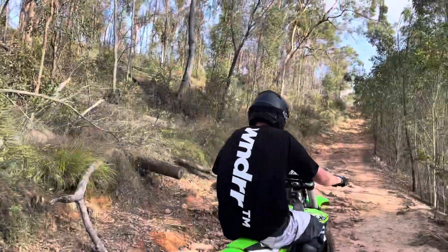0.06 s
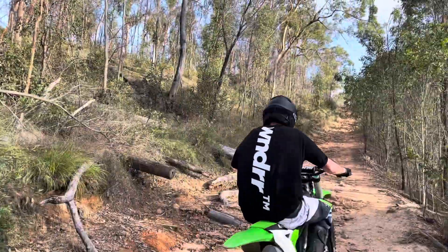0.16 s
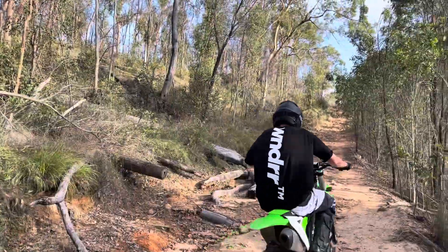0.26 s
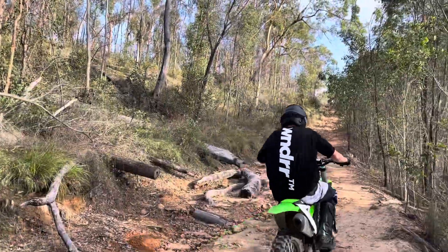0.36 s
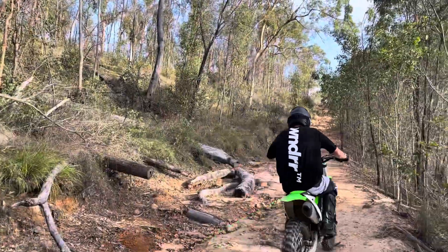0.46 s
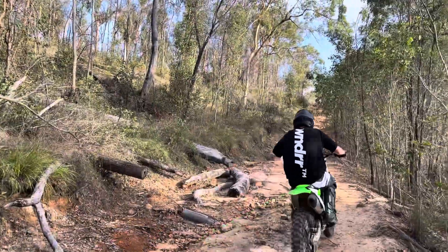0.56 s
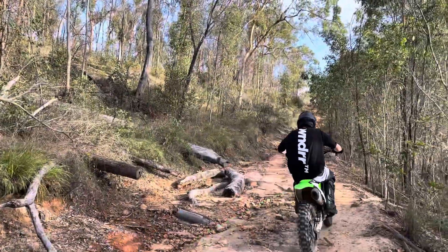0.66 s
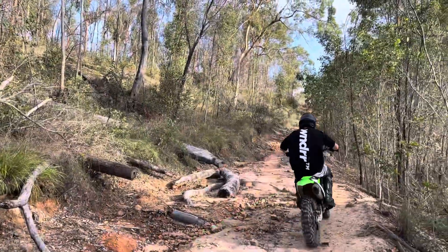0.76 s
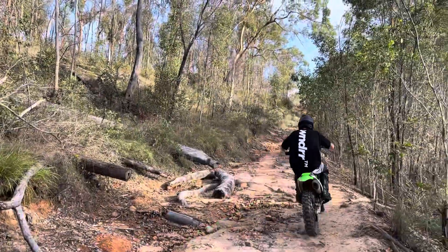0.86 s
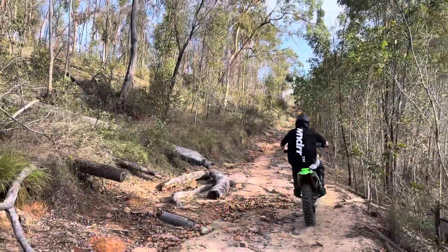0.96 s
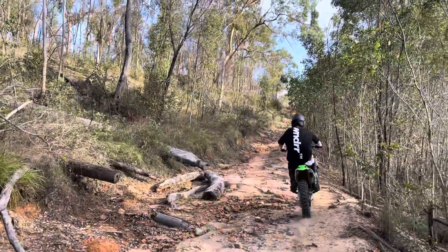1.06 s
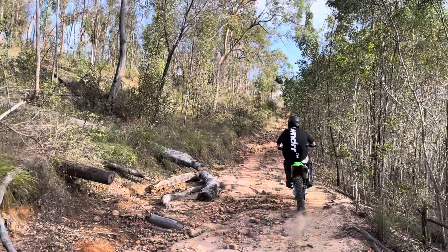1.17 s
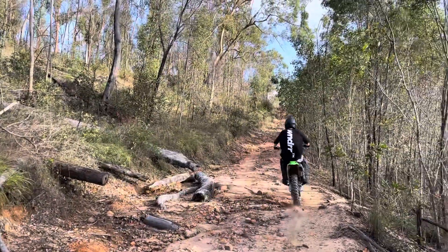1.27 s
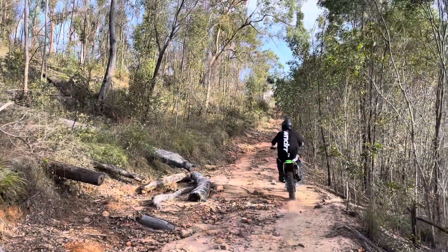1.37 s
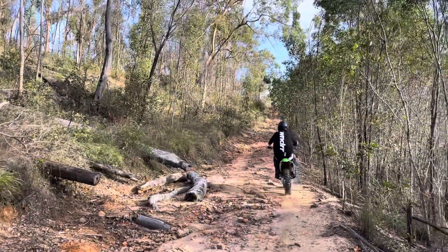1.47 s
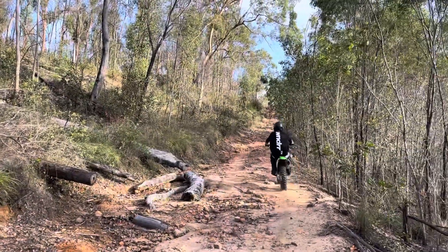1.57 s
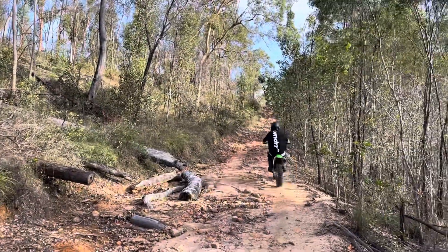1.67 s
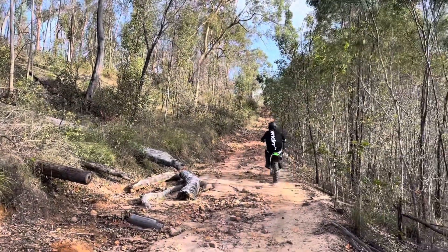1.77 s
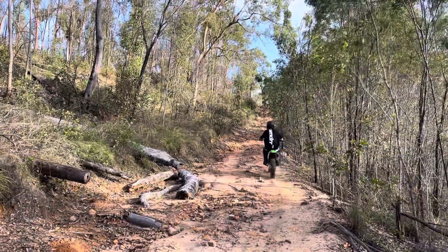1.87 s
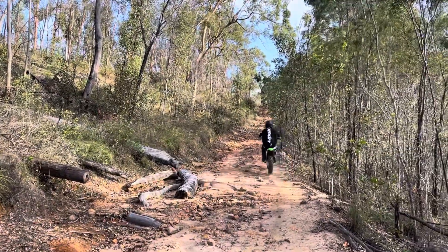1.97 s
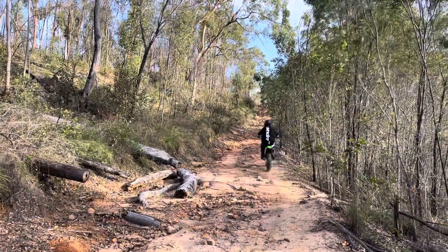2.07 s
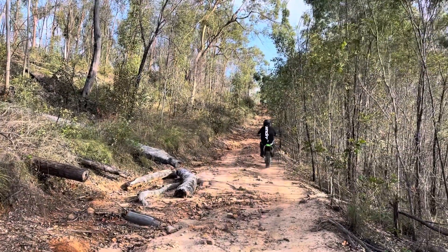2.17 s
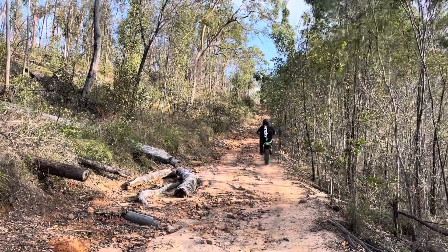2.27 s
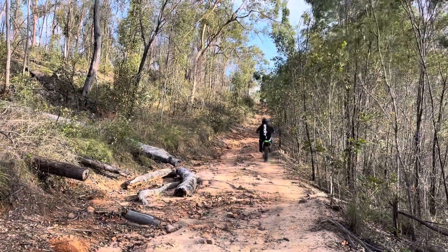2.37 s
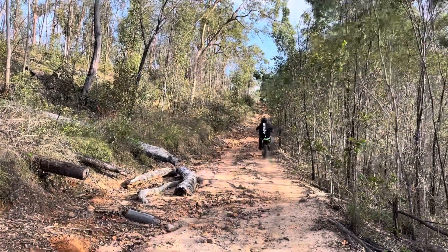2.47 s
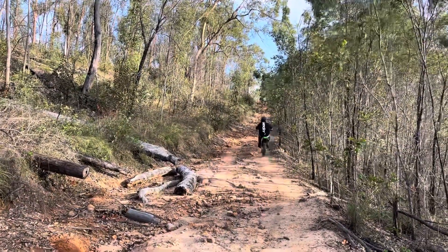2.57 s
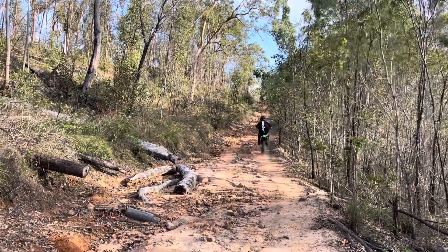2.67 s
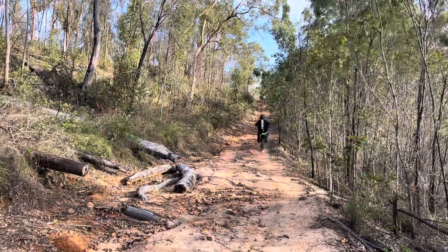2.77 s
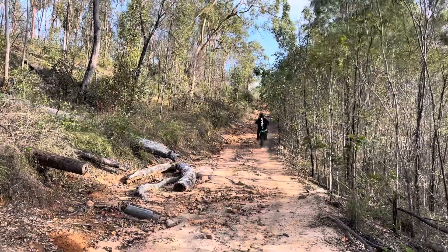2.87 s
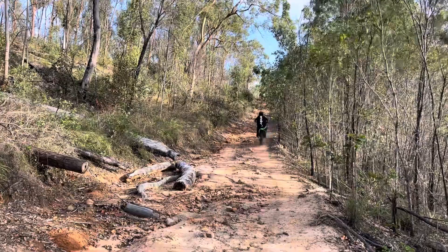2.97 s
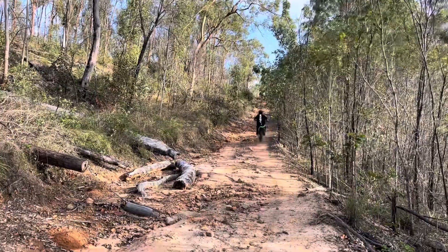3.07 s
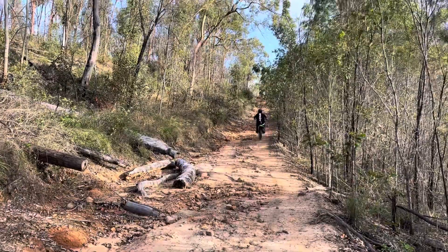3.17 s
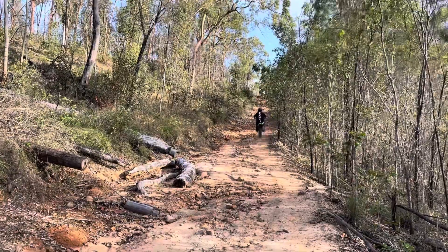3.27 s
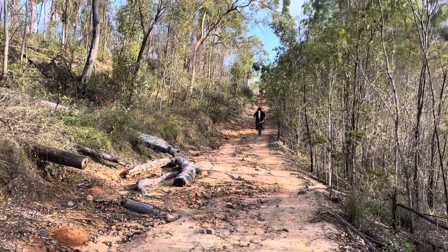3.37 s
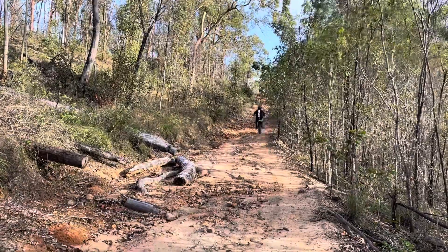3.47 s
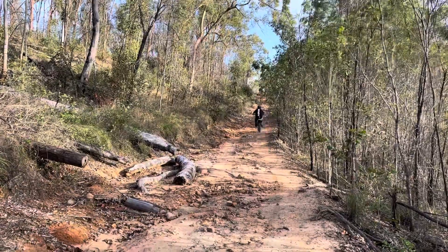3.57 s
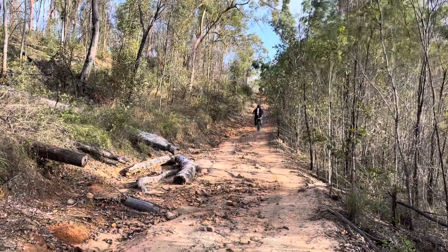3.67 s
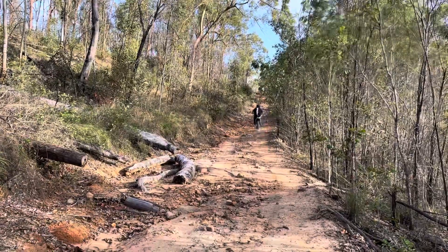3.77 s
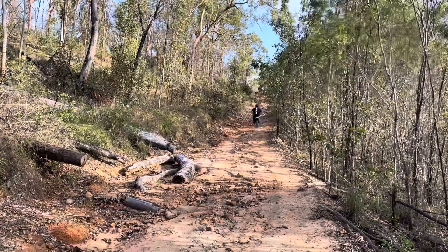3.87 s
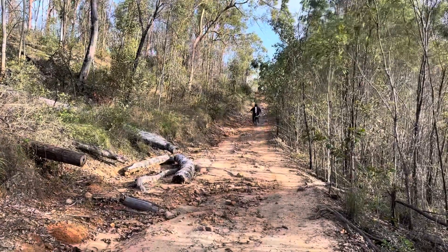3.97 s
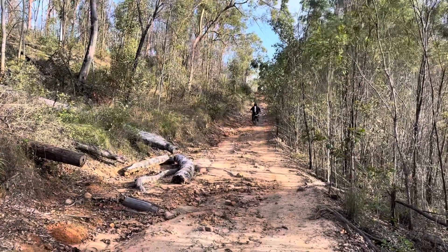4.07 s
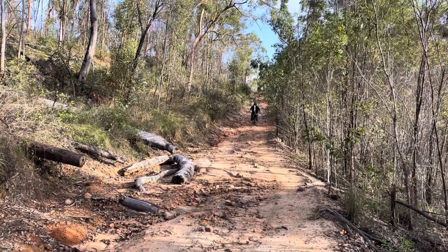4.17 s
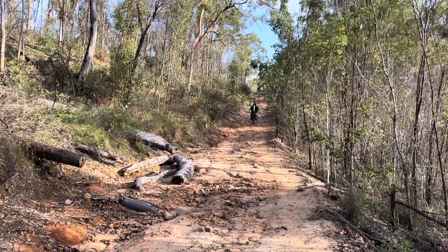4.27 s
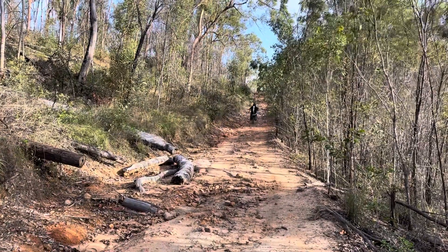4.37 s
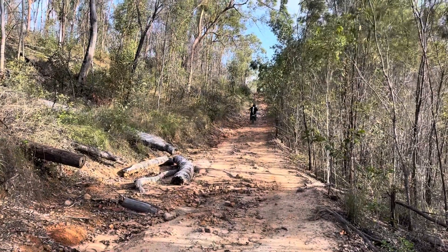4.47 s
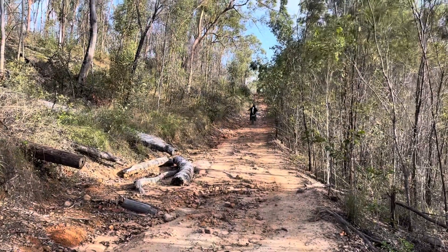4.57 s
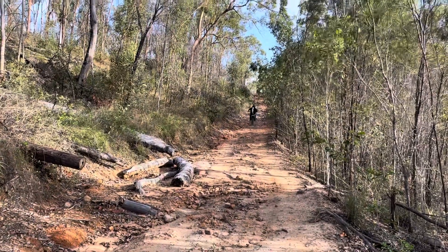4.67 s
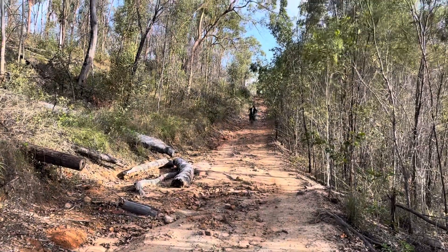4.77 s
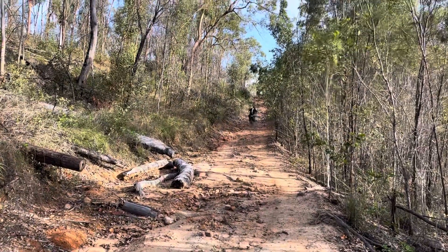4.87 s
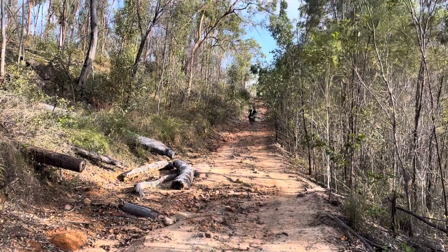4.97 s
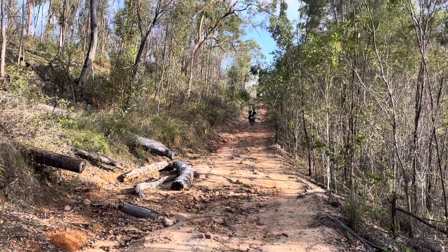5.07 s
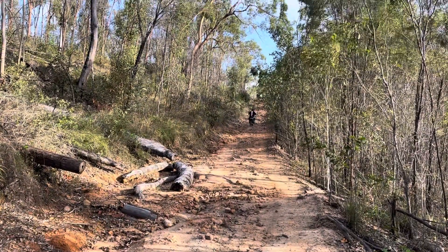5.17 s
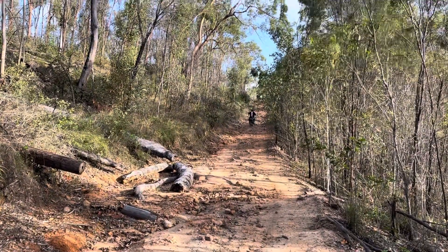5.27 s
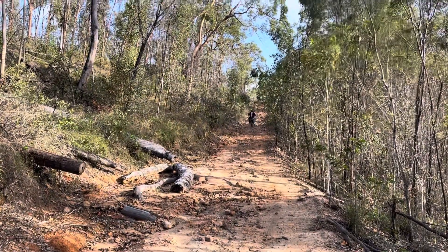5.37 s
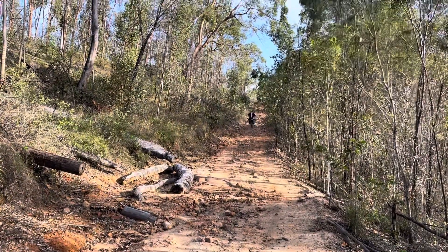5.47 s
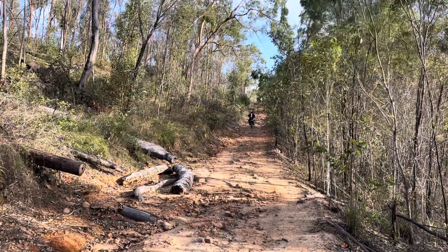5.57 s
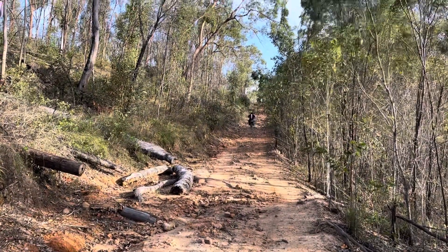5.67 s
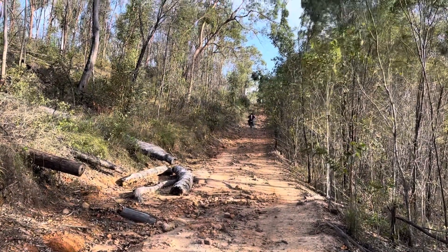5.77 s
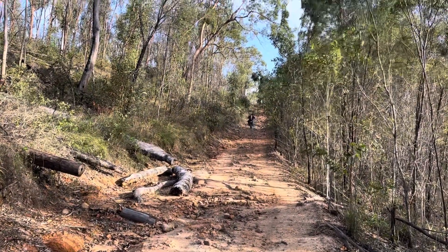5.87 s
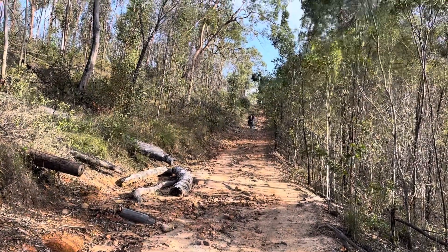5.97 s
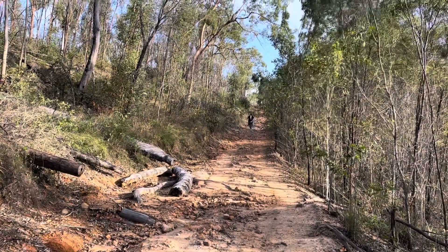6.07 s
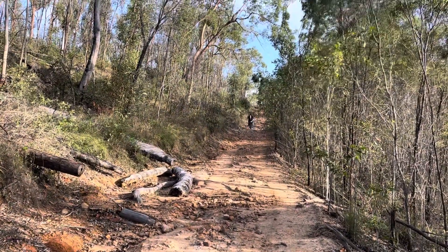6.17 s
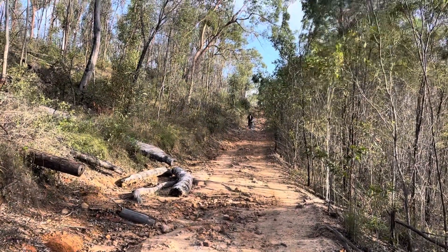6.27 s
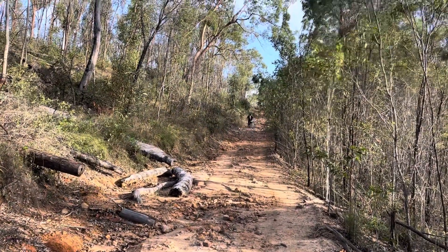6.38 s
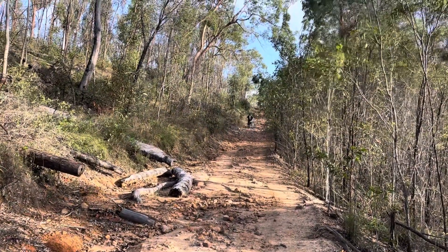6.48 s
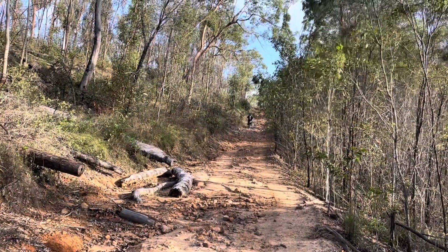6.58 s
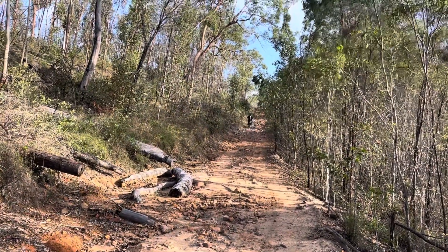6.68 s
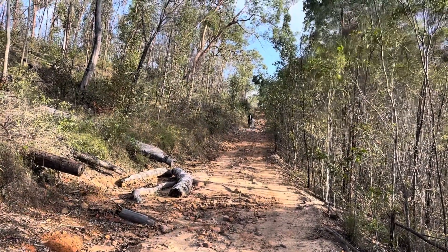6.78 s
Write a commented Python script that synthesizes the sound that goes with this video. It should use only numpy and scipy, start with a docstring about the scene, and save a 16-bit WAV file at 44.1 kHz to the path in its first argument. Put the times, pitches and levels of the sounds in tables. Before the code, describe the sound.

A single-cylinder four-stroke dirt bike is right beside the microphone at 0 s, its exhaust barking loud and hollow, about 26 heavy pulses a second, with sharp cracks at 0.25-0.4 s. At about 0.5 s the throttle shuts and two deep chugs sound. From 0.63 s it opens again, crackling, and revs climb to roughly 32 by 1 s, then waver up toward 37 through 3.1 s as the bike climbs away; faint gear whine fades by 2 s, and a harsher rasp shows around 2.5 s. A backfire bangs at 3.15 s, then a steadier, more distant pull lasts until 4.4 s. After a drop, a short hard rev flares highest near 4.8 s. More brief blips follow around 5.3, 5.7, 5.95 and 6.6 s, separated by soft low thuds, uneven pops and a 5.8 s backfire. Trees add short diffuse echoes; the distant rasp blurs into wash.

```python
"""A hard exhaust bark and cracks from close by: a single-cylinder four-stroke dirt bike pulls away
and climbs a rough forest track, the throttle opened and shut in bursts near the top.
Each firing rings the exhaust pipe modes and blows a puff of noise; with the throttle shut a soft, low
thud is left. Trees scatter the sound back; with distance the puffs blur into a steadier wash."""
import sys
import numpy as np
from scipy import signal
from scipy.fft import rfft, irfft, next_fast_len
from scipy.io import wavfile

SR = 44100
rng = np.random.default_rng(int(sys.argv[2]) if len(sys.argv) > 2 else 0)


def unload_audio(sound):
    """Save the sound as a 16-bit wav file, at the path given as the first command line argument."""
    columns = np.transpose(np.atleast_2d(sound))
    # keep every value between -1 and 1, then stretch to whole-number steps
    steps = np.round(np.clip(columns, -1, 1) * 32767)
    wavfile.write(sys.argv[1], SR, steps.astype(np.int16))


N = 301203
TIME = np.arange(N) / SR


def from_db(db):
    """Decibels to gain."""
    return 10 ** (np.asarray(db) / 20)


def rms_one(x):
    """Scale to unit power."""
    return x / np.sqrt(np.mean(x ** 2) + 1e-20)


def read(rows, when):
    """The columns of a curve at the given times."""
    s, *columns = np.transpose(rows)
    return [np.interp(when, s, c) for c in columns]


def at_hz(points, hz):
    """A spectrum read on a log-frequency axis."""
    f, value = np.transpose(points)
    return np.interp(np.log(hz), np.log(f), value)


def butter(x, hz, kind, order=2):
    """Butterworth filter."""
    sos = signal.butter(order, np.clip(hz, 10, .45 * SR), kind, fs=SR, output="sos")
    return signal.sosfilt(sos, x)


# Stereo width. Each row: frequency in Hz, side minus mid in dB.
WIDTH = [(100, -21), (400, -8), (2500, -15.5), (5000, -11), (9000, 2.5)]
# Stereo balance. Each row: frequency in Hz, left minus right in dB.
BALANCE = [(100, -8), (400, -9), (1400, -2.5), (2800, -0.5), (5000, 2.2), (9000, 0)]


def stereo_noise(spectrum):
    """Coloured noise, mid of unit power; width and balance vary with frequency."""
    size = next_fast_len(N, True)
    hz = np.maximum(np.fft.rfftfreq(size, 1 / SR), 1)
    mid, side = rfft(rng.standard_normal((2, size)))
    sign = np.array([[1], [-1]])
    low_hz, high_hz = spectrum[0][0], spectrum[-1][0]
    ends = 1 / (1 + (low_hz / hz) ** 4) / (1 + (hz / high_hz) ** 12)
    gain = ends * from_db(at_hz(spectrum, hz) + sign * at_hz(BALANCE, hz) / 2)
    both = irfft(gain * (mid + sign * side * from_db(at_hz(WIDTH, hz))))[:, :N]
    return both / np.std(both.mean(axis=0))


def lay_out(shapes, when):
    """Add one short shape per event along the time line."""
    out = np.zeros(N + 2 * SR)   # a spare second at each end
    for shape, start in zip(shapes, ((when + 1) * SR).astype(int)):
        out[start:start + len(shape)] += shape
    return out[SR:SR + N]


# Throttle twists; revs climb to a top, then sink until the next. Each row: lowest revs in seconds,
# opens in seconds, wide open in seconds, top revs in seconds, eases in seconds, shut in seconds,
# lowest firings per second, top firings per second, strength in dB, later coasting thud in dB.
PULLS = [(-.1, -.1, -.05, 0, .48, .555, 26.2, 26.18, 0, -27),
         (.582, .625, .8, 1.015, 3.11, 3.205, 23.64, 31.83, 0, -27),
         (3.214, 3.225, 3.45, 3.42, 4.33, 4.38, 30.14, 36.05, 0, -26.5),
         (4.546, 4.56, 4.76, 4.834, 4.835, 4.868, 28.4, 47.84, 6.3, -24.3),
         (5.029, 5.04, 5.24, 5.29, 5.33, 5.385, 30.16, 36.23, 0, -25.5),
         (5.415, 5.435, 5.68, 5.708, 5.72, 5.775, 29.67, 37.44, 3.5, -25.8),
         (5.855, 5.885, 5.93, 5.966, 6.005, 6.11, 28.7, 38.65, 8.5, -26.3),
         (6.396, 6.43, 6.55, 6.574, 6.69, 6.755, 23.5, 37.63, 2, -26.5)]
# Speed between those turning points, set by slope and ruts. Each row: time in seconds, firings per second.
GROUND_SPEED = [(.2, 24.78), (.501, 26.17), (1.984, 35.0), (2.173, 34.88), (2.556, 37.5), (2.95, 35.35),
                (3.12, 37.68), (3.905, 36.55), (4.052, 34.2), (4.204, 38.58), (4.399, 37.28), (6.745, 28.1)]


def speed(when):
    """Firings per second: the pulls' turning points joined with the ground's."""
    low_s, _, _, top_s, _, _, low_rate, top_rate, _, _ = np.transpose(PULLS)
    turns = np.vstack([np.c_[low_s, low_rate], np.c_[top_s, top_rate], GROUND_SPEED])
    return read(turns[np.argsort(turns[:, 0])], when)[0]


FULL_FLOW_PER_S = 37   # firings per second


def overrev(when):
    """Octaves of engine speed past full flow."""
    return np.log2(np.maximum(speed(when) / FULL_FLOW_PER_S, 1))


# Single charges burn badly and give only a thud. Each row: time in seconds, thud in dB.
STUMBLES = [(3.153, -38), (3.215, -29), (3.31, -34), (4.568, -28), (5.035, -29), (5.52, -25), (5.808, -38),
            (6.13, -31), (6.3, -32), (6.42, -40)]
STUMBLE_S = .02   # reach on either side
SNAP_S = .02   # switch between coasting and pulling
LIGHT_DB = -6   # barely open against wide open


def throttle(when):
    """Load 0 to 1, pull strength in dB, coasting thud in dB, opening 0 to 1."""
    _, opens, wide, _, eases, shut, _, _, strength_db, coast_db = np.transpose(PULLS)
    stumble_s, stumble_db = np.transpose(STUMBLES)
    t = when[:, None]
    rise = (t - opens) / np.maximum(wide - opens, SNAP_S)
    fall = (shut - t) / np.maximum(shut - eases, SNAP_S)
    opening = np.clip(np.minimum(rise, fall), 0, 1)
    widest = opening.max(axis=1)
    stumble = np.clip(2 - 2 * np.abs(t - stumble_s) / STUMBLE_S, 0, 1)
    sound = 1 - stumble.sum(axis=1)   # share of healthy burn
    load = sound * np.clip(np.minimum(t - opens, shut - t) / SNAP_S, 0, 1).max(axis=1)
    last_shut = np.maximum(np.searchsorted(eases, when) - 1, 0)
    pull_db = load * (opening @ strength_db + LIGHT_DB * (1 - widest))
    return load, pull_db, sound * coast_db[last_shut] + stumble @ stumble_db, widest


# Levels under load as the bike rides away. Each row: time in seconds, pipe thud in dB,
# exhaust bark in dB, rasp in dB (all before the pull's strength).
RECEDING = [(0, -21.7, -17.5, -33.3), (.33, -19.3, -23.5, -34.8), (.46, -19, -28.3, -37.3),
            (.62, -18.7, -30.5, -38), (.86, -18.2, -28.7, -34.7), (1.35, -23.3, -27.3, -42),
            (1.55, -25, -28.2, -44.2), (2.55, -26.9, -31.3, -45.5), (3.1, -27.6, -32.7, -46.5),
            (3.27, -29, -31, -46.5), (3.45, -28.8, -31.5, -47.4), (3.9, -32.3, -32.3, -48.3),
            (4.35, -32, -30.7, -46.9), (5.25, -28.8, -30.8, -44.8), (6.6, -30.5, -31.5, -46)]
SHUT_BARK_DB, SHUT_RASP_DB, SHUT_HUM_DB = -11.5, -4.5, -3   # change with the throttle shut
HUM_DB, HUM_FADE_DB_PER_S = -33, -.6   # under load
THUD_FOLLOWS, HUM_FOLLOWS, RASP_FOLLOWS = .65, .45, .75   # dB per dB of pull
OVERREV_THUD_DB, OVERRUN_RASP_DB = -17, 30   # per octave past full flow; rasp with the throttle shut


def effort(when):
    """Levels of crank hum, pipe thud, bark and rasp in dB, from throttle and distance."""
    load, pull_db, coast_db, _ = throttle(when)
    thud_db, bark_db, rasp_db = read(RECEDING, when)
    shut, over = 1 - load, overrev(when)
    hum_db = HUM_DB + HUM_FADE_DB_PER_S * when + HUM_FOLLOWS * pull_db + SHUT_HUM_DB * shut
    thud_db = load * (thud_db + OVERREV_THUD_DB * over) + shut * coast_db + THUD_FOLLOWS * pull_db
    bark_db = bark_db + pull_db + SHUT_BARK_DB * shut * np.exp(-2 * over)
    rasp_db = rasp_db + RASP_FOLLOWS * pull_db + (SHUT_RASP_DB + OVERRUN_RASP_DB * over) * shut
    return hum_db, thud_db, bark_db, rasp_db


LOADED_HZ, COASTING_HZ = 195, 149   # at full flow
LOADED_SLOPE, COASTING_SLOPE = .78, .48   # octaves of pitch per octave of engine speed


def pipe_tuning(when):
    """Lowest pipe resonance in Hz: hot gas and faster flow raise it, until full flow."""
    load, flow = throttle(when)[0], np.minimum(speed(when) / FULL_FLOW_PER_S, 1)
    loaded_hz = LOADED_HZ * flow ** LOADED_SLOPE
    coasting_hz = COASTING_HZ * flow ** COASTING_SLOPE
    return load * loaded_hz + (1 - load) * coasting_hz


HOT_HZ = 184   # pipe tuning at which the modes have their listed pitch
STEADY_SHARE = .7   # scatter between firings that remains under load
SWING_S = -.0024   # first pressure pulse, relative to the firing
SAG_AT_S, SAG_S = .006, .007   # middle and length of the pitch slide


def pipe(when, modes, level_db, rough_db, detune, mode_db, roundness, bends, sag=0, coast_damping=1):
    """Every firing rings the pipe modes, with slightly different strengths and tuning."""
    lead_s = .016
    age = np.arange(SR // 15) / SR - lead_s
    rate, pipe_hz = speed(when), pipe_tuning(when)
    load = throttle(when)[0][:, None]
    # a faster gas flow damps the pipe more
    damping = (rate[:, None] / 35) ** (0.7 * load) * coast_damping ** (1 - load)
    # all modes swing together as the first pressure pulse leaves; cooling gas slides them down
    slide = 1 - sag * load * damping * np.tanh((age - SAG_AT_S) / SAG_S)
    clock = np.cumsum(slide, axis=1) / SR
    clock = clock - clock[:, [np.searchsorted(age, SWING_S)]]
    rings = 0
    for (hz, width_hz, db, follows, crest_s), extra_db, bend in zip(modes, mode_db, bends):
        tune, strength = rng.standard_normal((2, len(when))) * STEADY_SHARE ** load[:, 0]
        pitch_hz = hz * bend * (pipe_hz / HOT_HZ) ** follows * (1 + detune * tune)
        gain = from_db(db + extra_db + rough_db * strength)
        # muffler chambers round off the attack: swell to the crest, then die away
        u = np.maximum(1 + (age - crest_s / damping) * width_hz * damping * 2.4, 0)
        swell = (u * np.exp(1 - u)) ** roundness
        rings = rings + gain[:, None] * swell * np.cos(2 * np.pi * pitch_hz[:, None] * clock)
    power = np.sum(rings ** 2, axis=1) * rate / SR
    return lay_out(rings * (from_db(level_db) / np.sqrt(power))[:, None], when - lead_s)


# Muffler chambers from right behind. Each row: pitch in Hz, width in Hz, level in dB,
# share of the pipe tuning followed, crest after the firing in seconds.
CLOSE_MODES = [(325, 80, 0, 0, -.0002), (455, 78, 0, 0, .0004), (585, 90, -1, 0, 0)]
# Drift of the upper two. Each row: time in seconds, second's pitch ratio, third's pitch ratio,
# second's level in dB, third's level in dB.
CLOSE_RING = [(.05, 1.01, 1.07, -3, -15), (.2, .96, .96, -1, -7), (.34, 1.02, .99, 1, -2),
              (.48, 1.08, 1.04, -2, -6)]


def close_bark(when, level_db):
    """Right behind the muffler its chambers ring on, the upper two shifting as the bike moves off."""
    second, third, second_db, third_db = read(CLOSE_RING, when)
    return pipe(when, CLOSE_MODES, level_db, rough_db=1.8, detune=.02,
                mode_db=[0, second_db, third_db], roundness=3.2, bends=[1, second, third])


# Low pipe modes. Each row: hot pitch in Hz, width in Hz, level in dB,
# share of the pipe tuning followed, crest after the firing in seconds.
THUD_MODES = [(184, 65, 18, 1, 0.004), (97, 56, -9, 0.85, 0.007), (120.3, 31, -11, 0.15, 0.012)]


def pipe_thud(when, level_db):
    """The low pipe modes; the pitch slides down as the gas cools, and coasting damps them more."""
    flat = np.zeros(len(THUD_MODES))
    return pipe(when, THUD_MODES, level_db, rough_db=3.5, detune=0.023, mode_db=flat,
                roundness=1.65, bends=flat + 1, sag=.2, coast_damping=1.06)


# Crank hum orders. Each row: multiple of the firing rate, relative level in dB.
HUM_ORDERS = [(1, -18), (2, 0), (3, -17)]


def crank_hum(cycles, level_db):
    """The crank turns twice per firing and hums mainly at that rate."""
    orders = sum(from_db(db) * np.sin(2 * np.pi * k * cycles + 1.0) for k, db in HUM_ORDERS)
    return from_db(level_db) * np.sqrt(2) * orders


def puffs(when, level_db, rise_s, decay_s):
    """Envelope of the gas jet: it swells as the valve opens, then fades."""
    lead_s = .025
    age = np.arange(SR // 14) / SR - lead_s
    shape = np.exp(np.minimum(age / rise_s, -age / decay_s))
    power = from_db(2 * level_db) / (np.sum(shape ** 2) * speed(when) / SR)
    return np.sqrt(lay_out(power[:, None] * shape ** 2, when - lead_s))


# Roar colour. Each row: frequency in Hz, density in dB per Hz.
ROAR = [(380, 0), (560, -3), (700, -11), (980, -6.5), (1150, -11)]
ROAR_DB, ROAR_FOLLOWS, SHUT_ROAR_DB = -24, .8, -10   # against the thud, dB per dB of pull, shut


def pipe_roar(when, thud_db):
    """Turbulence roars in the pipe mouth with each firing."""
    load, pull_db, _, _ = throttle(when)
    level_db = thud_db + ROAR_DB + ROAR_FOLLOWS * pull_db + SHUT_ROAR_DB * (1 - load)
    return puffs(when, level_db, rise_s=.005, decay_s=.011) * stereo_noise(ROAR)


FAR_SHARE, BLUR_S, SHARE_PER_DB = .25, 1.55, .05


def direct_share(when):
    """Share of the rasp not yet blurred by trees: falls with distance, rises with the pull."""
    near = np.exp(-(when / BLUR_S) ** 2)
    share = FAR_SHARE + (1 - FAR_SHARE) * near + SHARE_PER_DB * throttle(when)[1]
    return np.clip(share, .05, .95)


def flutter(depth_db, rate_hz):
    """Turbulence makes the jet ragged; unit power."""
    return rms_one(from_db(depth_db * rms_one(butter(rng.standard_normal(N), rate_hz, "low"))))


# Jet colour. Each row: frequency in Hz, density in dB per Hz.
PUFF = [(450, -18.5), (720, -1), (1000, -6.5), (1350, -5), (1700, -10), (2160, -11.3), (3730, -15.5),
        (6700, -27.5), (8000, -42), (10000, -31), (13600, -36)]


def gas_jet(when, level_db):
    """Each firing blows a ragged puff of hiss."""
    envelope = puffs(when - .0025, level_db, rise_s=0.0065, decay_s=.0125)
    return from_db(0.6) * envelope * flutter(depth_db=1.2, rate_hz=390) * stereo_noise(PUFF)


def muffler_rattle(when, level_db, decay_s):
    """The thin muffler shell answers every firing with the same dense, short ring."""
    age = np.arange(SR // 30) / SR
    ring = butter(rng.standard_normal(len(age)), [950, 2400], "band")
    ring = ring * np.sqrt(age) * np.exp(-age / decay_s)
    gain = from_db(level_db) / np.sqrt(np.sum(ring ** 2) * speed(when) / SR)
    return lay_out(gain[:, None] * ring, when)


KNOCK_DB, KNOCK_FADE_DB_PER_S, KNOCK_LEAD_S = -29, -9, .0105


def knock(when, decay_s):
    """The piston knocks just before the exhaust valve opens, under load; it fades with distance."""
    age = np.arange(SR // 60) / SR
    gain = from_db(KNOCK_DB + KNOCK_FADE_DB_PER_S * when) * throttle(when)[0]
    shape = np.tanh(age / .0005) * np.exp(-age / decay_s)
    envelope = lay_out(gain[:, None] * shape, when - KNOCK_LEAD_S)
    return envelope * stereo_noise([(1400, -4), (2000, 0), (3000, -10)])


# Scattered rasp colour. Each row: frequency in Hz, density in dB per Hz.
SCATTER = [(650, -32), (1000, -9.5), (1300, -2.5), (1650, -3), (2070, -6), (3100, -12.5), (4200, -9),
           (6900, -19.5), (8000, -38.5), (10500, -22.5), (13600, -29)]


def tree_wash(level_db):
    """The rasp that the trees have blurred into steady noise."""
    blurred = np.sqrt(1 - direct_share(TIME))
    return from_db(-0.73) * from_db(level_db) * blurred * stereo_noise(SCATTER)


# Gear whine. Each row: time in seconds, level in dB.
WHINE = [(.6, -50), (1.25, -47), (1.6, -48.5), (2.1, -68)]


def gear_whine(cycles, mesh_per_firing, width_hz):
    """Primary gear teeth mesh at a multiple of the firing rate, unsteadily, while the bike is near."""
    level_db, = read(WHINE, TIME)
    waver = butter(rng.standard_normal(N), width_hz, "low")
    return from_db(level_db) * rms_one(waver * np.sin(2 * np.pi * mesh_per_firing * cycles))


# Rumble colour. Each row: frequency in Hz, density in dB per Hz.
RUMBLE = [(30, -8), (60, 11), (150, 9.5), (400, 7), (700, -12), (1100, -19)]
RUMBLE_DB, RUMBLE_FOLLOWS = -27.5, .5   # dB per dB of thud


def rumble(thud_db):
    """Low turbulence, following part of the thud's level."""
    return from_db(RUMBLE_DB + RUMBLE_FOLLOWS * thud_db) * stereo_noise(RUMBLE)


# Ground echo, closing in on the direct sound. Each row: time in seconds, delay in ms.
GROUND_ECHO = [(0, 2.6), (.5, 1.9), (1.2, 1.4), (3, 1.0), (6.8, .8)]
GROUND_SHARE = .3


def off_the_ground(x):
    """The track reflects the rasp, combing it with notches that glide upward."""
    delay_ms, = read(GROUND_ECHO, TIME)
    earlier = TIME - delay_ms / 1000
    echo = np.array([np.interp(earlier, TIME, side) for side in butter(x, 4000, "low", order=1)])
    return (x + GROUND_SHARE * echo) / np.sqrt(1 + GROUND_SHARE ** 2)


def far_off(x, dull_hz):
    """With distance air and foliage dull the treble, soft ground cuts a dip, the shell rings above it."""
    near = np.exp(-TIME / 7.8)
    x = x - .35 * np.clip(TIME / 2.2, 0, 1) ** 2 * butter(x, [860, 1080], "band", order=1)
    x = x + .3 * (1 - near ** 2) * butter(x, [1370, 1500], "band", order=1)
    return near * x + (1 - near) * butter(x, dull_hz, "low", order=1)


def forest(x, t60_s, dull_hz):
    """Many weak echoes from trunks, different on each side."""
    age = np.arange(SR // 2) / SR
    decay = from_db(-60 * age / t60_s)
    trunks = rng.standard_normal((2, len(age))) * (rng.random((2, len(age))) < .02)
    echoes = butter(trunks * decay * (age > .012), dull_hz, "low")
    echoes = echoes[0] + 0.32 * echoes[1] * np.array([[1], [-1]])
    echoes = echoes / np.sqrt(np.sum((trunks[0] * decay) ** 2))
    return signal.fftconvolve(x[None], echoes, axes=1)[:, :N]


# Exhaust overtones. Each row: hot pitch in Hz, width in Hz, level in dB,
# share of the pipe tuning followed, crest after the firing in seconds.
BARK_MODES = [(351, 76, 2, 0.46, -0.0012), (530, 72, -2.5, 0.46, 0), (760, 98, -15, 0.27, 0.0048),
              (318, 40, -17, 0, .005)]
# Third overtone, coming and going along the track. Each row: time in seconds, added level in dB.
THIRD = [(0, -8), (.55, -6), (.83, 10), (1.1, 7), (1.35, -6), (1.95, 5), (2.2, 1), (2.52, 7), (2.95, -4),
         (3.12, 6), (3.22, -9), (3.38, -9), (3.43, 6), (4.1, -2), (4.35, 6), (4.7, 7), (4.83, 0),
         (5.3, 5.5), (6, -8), (6.6, -2)]
LIGHT_THIRD_DB, THIRD_ROUGH_DB, THIRD_WAVER = -6, 2, .03   # barely open; scatter in level, pitch ratio
THIRD_START_RATIO, THIRD_FALL_PER_S = 1.07, .02
SECOND_DB = -4
CHAMBER_FOLLOWS = 1.3   # dB per dB of pull
OVERREV_BARK_SLOPE = .28   # octaves of pitch per octave past full flow


def track_bark(when, level_db):
    """The pipe overtones: the third sinks slowly, a muffler chamber rings out on a hard pull."""
    _, pull_db, _, opening = throttle(when)
    waver, flare = rng.standard_normal((2, len(when)))
    third_db = read(THIRD, when)[0] + LIGHT_THIRD_DB * (1 - opening) + THIRD_ROUGH_DB * flare
    chamber_db = CHAMBER_FOLLOWS * np.maximum(pull_db, 0)
    lift = 2 ** (OVERREV_BARK_SLOPE * overrev(when))
    third = THIRD_START_RATIO - THIRD_FALL_PER_S * when + THIRD_WAVER * waver
    return pipe(when, BARK_MODES, level_db, rough_db=1.5, detune=0.014,
                mode_db=[0, SECOND_DB, third_db, chamber_db], roundness=3.6, bends=[lift, 1, third, lift])


def cracks(s, db, decay_s):
    """Late-burning fuel pops in the muffler: a few milliseconds of throaty noise each."""
    age = np.arange(SR // 50) / SR
    envelope = lay_out(from_db(db)[:, None] * np.tanh(age / .0005) * np.exp(-age / decay_s), s)
    return envelope * stereo_noise([(900, -0.5), (1800, 5), (5500, -20)])


# Sharp cracks as the throttle snaps or a charge burns hard. Each row: time in seconds, relative level in dB.
CRACKS = [(.247, -19), (.327, -23), (.404, -19), (.642, -26), (.7585, -25), (.795, -23), (.831, -20),
          (.866, -23), (.9005, -22), (.9335, -25), (.998, -24), (1.030, -26), (3.1502, -30.5), (3.306, -33),
          (4.38, -33), (4.4343, -28), (4.593, -36), (4.7321, -29), (4.7795, -26), (4.801, -29),
          (4.9651, -29), (5.0275, -27.5), (5.4211, -30), (5.6327, -31), (5.6611, -28), (5.69, -28),
          (5.715, -30), (5.8027, -29), (5.9304, -20), (5.9575, -25), (5.9855, -19.5), (6.0105, -22.5),
          (6.1559, -32), (6.256, -32), (6.329, -34), (6.369, -34), (6.594, -31), (6.7545, -30)]


def snaps():
    """Single sharp cracks from the muffler."""
    s, db = np.transpose(CRACKS)
    return from_db(-6) * cracks(s, db, decay_s=0.0037)


# Deep chugs as the throttle is chopped. Each row: time in seconds, pitch in Hz, relative level in dB.
CHUGS = [(.572, 80, -21), (.614, 78, -22)]


def chugs(length_s):
    """Each chug is a couple of slow swings of the gas in the pipe; length is for 80 Hz."""
    age = np.arange(-SR // 25, SR // 25) / SR
    s, hz, db = np.transpose(CHUGS)
    hz = hz[:, None]
    swell = np.exp(-(age / (length_s * 80 / hz)) ** 2)
    return lay_out(from_db(db)[:, None] * swell * np.sin(2 * np.pi * hz * age), s + age[0])


# Rasp on the steep part of the climb. Each row: time in seconds, level in dB.
CLIMB_RASP = [(1.5, -66), (1.95, -55), (2.2, -55), (2.52, -50), (2.85, -55.5), (3.3, -76)]
# Its colour. Each row: frequency in Hz, density in dB per Hz.
CLIMB_COLOUR = [(1200, -7), (1850, 0), (2200, 0), (2700, -11)]


def climb_rasp(when):
    """Puffs of noise near 2 kHz that stand out on the steep part."""
    level_db, = read(CLIMB_RASP, when)
    return puffs(when, level_db, rise_s=.008, decay_s=.016) * stereo_noise(CLIMB_COLOUR)


def overrun_pops(when, level_db):
    """Once the muffler is hot, charges pop unevenly in it whenever the throttle is shut."""
    shut = (throttle(when)[0] < .5) & (when > 3)
    return cracks(when[shut] - .003, level_db[shut], decay_s=0.0043)


# Backfires as the throttle is chopped. Each row: time in seconds, relative level in dB.
BACKFIRES = [(3.1512, -15.5), (5.8035, -19)]


def backfires(start_hz, end_hz, glide_s, rise_s, decay_s):
    """Unburnt fuel goes off in the pipe: a sudden bang whose ring drops in pitch."""
    s, db = np.transpose(BACKFIRES)
    age = np.arange(SR // 20) / SR
    turns = np.cumsum(end_hz + (start_hz - end_hz) * np.exp(-age / glide_s)) / SR
    swell = np.tanh(age / rise_s) * np.exp(-(age / decay_s) ** 2)
    return lay_out(-from_db(db)[:, None] * np.sin(2 * np.pi * turns) * swell, s)


CLOSE_S = .6   # muffler right in front
COAST_UNEVEN_DB = 1.0   # spread between firings, throttle shut


def scene():
    """One firing per two crank turns drives thud, bark and rasp; the crank hums along."""
    cycles = np.cumsum(speed(TIME)) / SR - .4
    when = np.interp(np.arange(int(cycles[-1]) + 1), cycles, TIME)
    late, burn, misfire = rng.standard_normal((3, len(when)))
    when = when + 0.00016 * late   # no two charges burn alike
    _, thud_db, bark_db, puff_db = effort(when)
    hum_db, thud_curve_db, _, rasp_db = effort(TIME)
    uneven_db = COAST_UNEVEN_DB * (1 - throttle(when)[0]) * misfire

    behind = np.clip(np.exp(-(when / CLOSE_S) ** 6), 1e-6, 1 - 1e-6)   # share of power
    bark_db = bark_db + 1.5 * uneven_db + .6 * burn
    bark = close_bark(when, bark_db + 10 * np.log10(behind))
    bark = bark + track_bark(when, bark_db + 10 * np.log10(1 - behind))
    thud = pipe_thud(when, thud_db + uneven_db + 0.45 * burn)
    bangs = backfires(start_hz=390, end_hz=140, glide_s=.004, rise_s=.002, decay_s=.011)
    low = from_db(1.18) * thud + crank_hum(cycles, hum_db) + chugs(length_s=.013) + bangs
    exhaust = low * from_db([[-.3], [.3]]) + from_db(0.19) * bark * from_db([[-1.3], [1.3]])

    jet_db = puff_db + 10 * np.log10(direct_share(when)) + 0.65 * burn
    rattle = muffler_rattle(when - .006, jet_db - 12, decay_s=.005) * from_db([[-1], [1]])
    rasp = gas_jet(when, jet_db) + rattle + knock(when, decay_s=.003) + tree_wash(rasp_db)
    rasp = rasp + snaps() + climb_rasp(when) + overrun_pops(when, puff_db + 5 + 2.2 * burn)
    rasp = far_off(off_the_ground(rasp), dull_hz=8500)
    rasp = rasp + gear_whine(cycles, mesh_per_firing=45.2, width_hz=35)

    echoes = from_db(-10.5) * forest(thud + bark + bangs, t60_s=.6, dull_hz=2500)
    return exhaust + pipe_roar(when, thud_db) + rasp + rumble(thud_curve_db) + echoes


CUTOFF_HZ = 13700


def record(dry):
    """The microphone sheds the deep bass; the top is cut."""
    thin = butter(dry, 39.6, "high", order=4)
    return signal.sosfilt(signal.ellip(10, .2, 80, CUTOFF_HZ, fs=SR, output="sos"), thin)


dry = scene()
out = record(dry)
unload_audio(out)
```